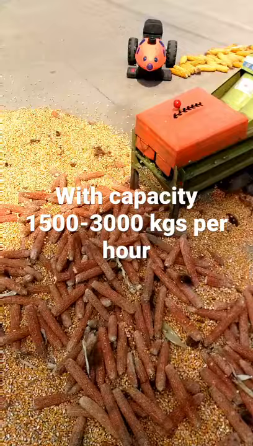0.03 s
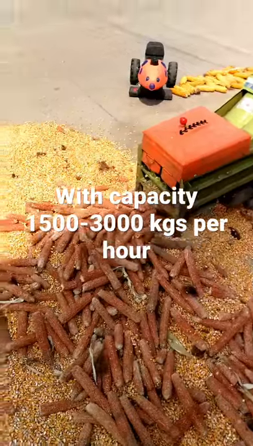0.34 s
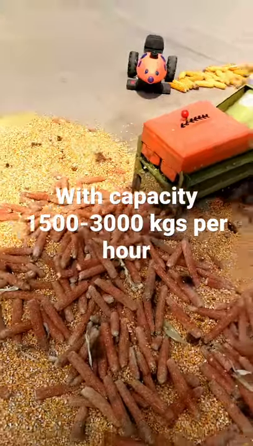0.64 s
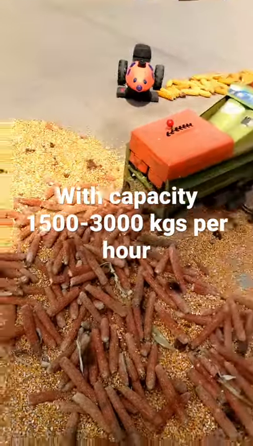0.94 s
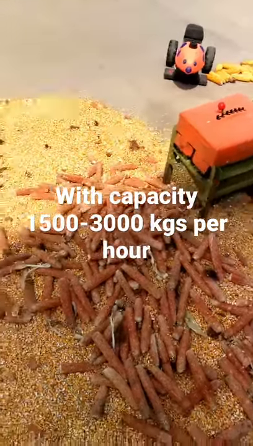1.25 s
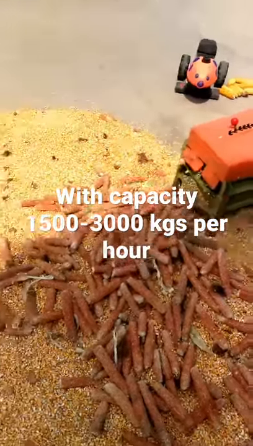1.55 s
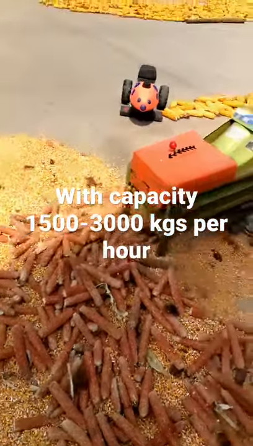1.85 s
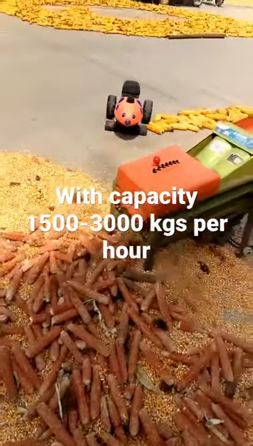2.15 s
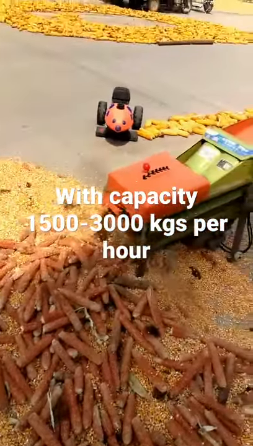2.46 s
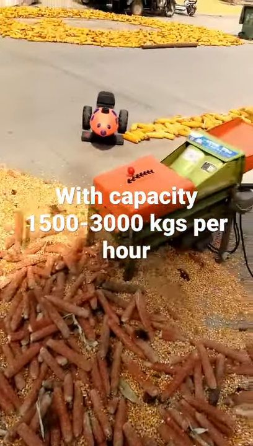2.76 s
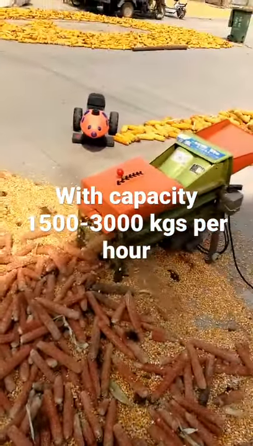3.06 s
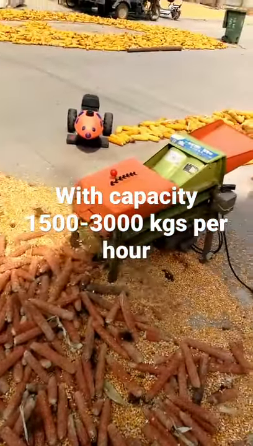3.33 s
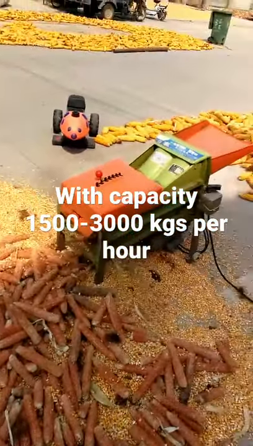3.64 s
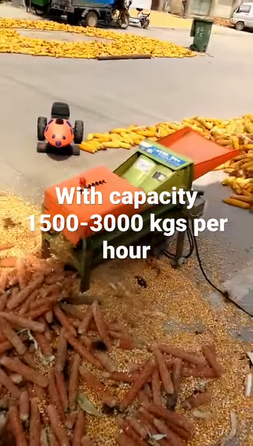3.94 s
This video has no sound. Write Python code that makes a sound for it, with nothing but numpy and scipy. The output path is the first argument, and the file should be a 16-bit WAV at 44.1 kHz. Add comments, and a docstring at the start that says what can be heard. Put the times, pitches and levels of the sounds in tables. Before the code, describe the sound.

Heard from close by outdoors, an electric corn thresher starts with a light rattle and grows louder as cobs go in. Irregular knocks, buzzing panels and a crunching spray of kernels continue over the wavering motor.

```python
"""An electric corn thresher runs outdoors, heard from close by. At first the drum rattles almost empty.
Then cobs are fed in: they tumble and knock against the sheet-steel casing and make it ring.
Kernels snap off with a crunch and hail on the metal, and loose panels buzz harder after each knock.
Underneath, the frame rumbles and the motor's whine sags a little under the load."""
import sys
import numpy as np
from scipy import signal
from scipy.fft import rfft, irfft
from scipy.io import wavfile

SR = 44100
rng = np.random.default_rng(int(sys.argv[2]) if len(sys.argv) > 2 else 0)


def transcribe(u):
    """Save the signal u as a 16-bit wav file named by the first command-line argument.

    u: samples, shape (n,) or (channels, n), limited to [-1, 1]; the rate is SR.
    q: integer samples, one column per channel.
    """
    v = np.clip(np.atleast_2d(u).T, -1, 1)
    q = np.round(v * 32767).astype(np.int16)
    wavfile.write(sys.argv[1], SR, q)


N = 176400
T = np.arange(N) / SR
START_S, CUTOFF_HZ = 0.107, 7600
DEEP_BELOW_HZ = 520  # lower tones drum and thud, higher ones clatter and clack

# The frame's rumble. Each row: pitch in Hz, relative level in dB.
RUMBLE_SPECTRUM = [(20, -14), (50, -4.5), (75, -4.5), (120, 1), (200, -2.5), (500, -33.5)]
# The motor's whine. Each row: time in seconds, pitch in Hz, level in dB, roughness from 0 to 1.
MOTOR_WHINE = [(.12, 488, -32, .45), (.27, 488, -37, 0.6), (.33, 487, -27.5, 0.7), (.58, 485, -31, 0.3),
               (.66, 482, -25.5, 0), (.9, 482, -21.5, 0.1), (1.2, 477, -28, 1), (1.45, 475, -25, 0.5),
               (2.3, 477, -27, 1), (2.8, 477, -30.5, 0.6), (3.45, 481, -24, 0.56), (4, 483, -28.5, 0.46)]
# The ringing of the loose panels. Each row: pitch in Hz, width in Hz, level in dB.
PANEL_TONES = [(371.5, 96, -32), (708, 35, -43), (959, 25, -36), (997, 9.5, -33.5), (1200, 64, -40),
               (1496, 44, -40), (1642, 82, -37), (2466, 100, -45.5), (3176, 150, -46)]
# How much the treble flickers. Each row: pitch in Hz, size of the swings in dB.
FLICKER_DEPTH = [(1200, 1.5), (2200, 3), (3100, 5.5), (4200, 4.5), (5400, 6.5), (7500, 4.5)]
# The flow of kernels. Each row: time in seconds, relative level in dB.
KERNEL_FLOW = [(.12, -43.5), (.45, -39.5), (.6, -30), (.71, -28), (.725, -26), (.76, -20.5), (1.0, -20.5),
               (1.21, -18.5), (1.9, -15.5), (2.45, -15), (3.06, -18), (3.49, -15.5), (3.97, -20)]
# Kernels hitting steel. Each row: pitch in Hz, relative level in dB.
KERNEL_SPECTRUM = [(1200, -36.5), (2500, -30.5), (3300, -6), (4200, -3.5), (5000, -2), (5700, 0.5),
                   (6500, -1), (7300, 2.5), (7800, 0.5)]
# The first rush of kernels is the brightest. Each row: time in seconds, top treble boost in dB.
KERNEL_BRIGHTNESS = [(.12, 5.5), (.7, 3), (1.3, 1), (2, -3), (4, -1)]
# The ringing of the sieve. Each row: pitch in Hz, width in Hz, relative level in dB.
SIEVE_TONES = [(2430, 150, -13), (3045, 20, -22), (3805, 46, -21.5), (6500, 150, -17)]
# The crunch of cobs being stripped. Each row: time in seconds, relative level in dB.
CRUNCH_LEVEL = [(.12, -32.5), (.45, -30), (.72, -27.5), (.75, -22.5), (1.05, -25), (1.3, -22.5),
                (2.1, -20.5), (2.8, -21), (3.48, -22), (3.97, -25)]
# Kernels snapping off. Each row: pitch in Hz, relative level in dB.
SNAP_SPECTRUM = [(25, -26), (70, -23.5), (130, -9.5), (250, 2), (600, -1), (1150, 1), (1400, -0.5),
                 (1750, 0.5), (2200, -2.5), (2900, -5), (4000, -10), (8000, -17)]
# Cobs drumming on the casing (deep tones). Each row: time in seconds, relative level in dB.
DRUMMING_LEVEL = [(.12, -36.5), (.58, -27.5), (.66, -23), (.85, -19.5), (1.05, -19), (1.35, -17.5),
                  (1.9, -16.5), (2.25, -20.5), (2.7, -19.5), (3.22, -24), (3.48, -21.5), (3.97, -28)]
# Cobs clattering on the bars (higher tones). Each row: time in seconds, relative level in dB.
CLATTER_LEVEL = [(.12, -27.5), (.55, -26), (.75, -19), (1.0, -20.5), (1.22, -16), (1.55, -18.5), (2.4, -16),
                 (3.05, -17), (3.15, -17), (3.5, -20.5), (3.97, -20)]
# The ringing of the casing. Each row: pitch in Hz, width in Hz, relative level in dB.
CASING_TONES = [(167.1, 13, -11.5), (233.6, 50, -7), (253.8, 24, -4), (278.6, 17, -6), (308.4, 17, -9),
                (359.6, 21, -6.5), (430, 32, -8.5), (490.2, 31, -11), (637, 110, -8), (714, 42, -4.5),
                (754.5, 21, -12), (841, 70, -7), (928, 54, -4), (1012, 23, -11.5)]
# Hard knocks of single cobs. Each row: start in seconds, relative thud and clack levels in dB.
HARD_KNOCKS = [(.108, -28, -21.5), (0.168, -25, -16), (0.207, -22, -21), (.313, -28, -16),
               (.381, -31, -19.5), (.417, -28, -18), (0.486, -15, -12.5), (0.612, -6, -16),
               (.662, -23, -10), (0.732, -6, -12), (0.882, -10, -13), (1.109, -6, -9), (1.146, -10, -18.5),
               (1.208, -4, -8), (1.33, 0, -16), (1.363, -7, -15.5), (1.434, -7, -12), (1.655, -2, -10),
               (1.804, -3, -10.5), (2.078, -3, -9), (2.257, -3, -17.5), (2.464, 1, -6), (2.537, -3, -12),
               (2.575, -17, -18.5), (2.745, -17, -8.5), (2.832, -17, -14), (3.027, 0, -7.5),
               (3.067, -6, -8), (3.334, -16, -7.5), (3.383, -0.5, -29), (3.418, -9, -9), (3.495, -9, -9.5),
               (3.62, -5, -25), (3.748, -12, -18), (3.901, -16, -17.5)]
# The tones in one knock. Each row: pitch in Hz, relative level in dB, seconds to fade by 60 dB.
KNOCK_TONES = [(257, -5, 0.056), (343, -10.5, 0.025), (560, -13.5, 0.037), (727, 1, 0.019), (906, -2, .045),
               (1005, -9.5, 0.063)]


def from_db(db):
    """Turn decibels into a number to multiply by."""
    return 10 ** (np.asarray(db) / 20)


def unit_power(x):
    """Scale a sound to an average power of 1."""
    return x / np.sqrt(np.mean(x ** 2) + 1e-20)


def over_time(rows):
    """Join a table's rows with straight lines: one curve for each column after the time."""
    times, *columns = np.transpose(rows)
    return [np.interp(T, times, column) for column in columns]


def drift(rate_hz):
    """A smooth random wander of about 1 either way; a higher rate moves faster."""
    step, warm_up = 40, 2000
    r = np.exp(-2 * np.pi * rate_hz * step / SR)
    noise = rng.standard_normal(N // step + warm_up + 2)
    slow = signal.lfilter([1], [1, -2 * r, r * r], noise)[warm_up:]
    return np.interp(np.arange(N) / step, np.arange(len(slow)), unit_power(slow))


def ring(x, hz, width_hz):
    """Make a sound ring at one pitch; a narrower width rings longer."""
    r = np.exp(-np.pi * width_hz / SR)
    feedback = [1, -2 * r * np.cos(2 * np.pi * hz / SR), r * r]
    return signal.lfilter(np.array([1, 0, -1]) * (1 - r * r) / 2, feedback, x + 1e-18)


def colour(x, spectrum):
    """Shape a sound's lows and highs, then scale it to a power of 1."""
    hz, db = np.transpose(spectrum)
    freqs = np.maximum(np.fft.rfftfreq(N, 1 / SR), 1)
    gain = from_db(np.interp(np.log(freqs), np.log(hz), db)) * (freqs < CUTOFF_HZ)
    return unit_power(irfft(rfft(x) * gain, N))


def impacts(per_s, spread_db):
    """Clicks at random times; more spread makes a few of them stand out."""
    sizes = from_db(spread_db * np.minimum(rng.exponential(1, N), 4))
    return sizes * (rng.random(N) < per_s / SR)


def bursts(clicks, fade_s):
    """Every click sets off a short, fading burst of noise."""
    power = signal.lfilter([1], [1, -np.exp(-1 / (fade_s * SR))], clicks ** 2 + 1e-18)
    return np.sqrt(power) * rng.standard_normal(N)


def flicker(x, band_hz=130):
    """The treble flickers: each narrow band swells and fades by itself."""
    freqs, spectrum = np.fft.rfftfreq(N, 1 / SR), rfft(x)
    hz, depth_db = np.transpose(FLICKER_DEPTH)
    out = x
    for centre in np.arange(1200, CUTOFF_HZ, band_hz):
        band = irfft(spectrum * np.maximum(0, 1 - abs(freqs - centre) / band_hz), N)
        swing = drift(rate_hz=12)
        swing = swing - 0.38 * swing ** 2  # dips go further than swells
        gain = from_db(np.interp(centre, hz, depth_db) * swing)
        out = out + band * (unit_power(gain) - 1)
    return out


def soft_thump(start_s=3.385, length_s=0.038, hz=55, db=-33):
    """One soft thump: a low tone swells and dies away."""
    age = np.clip(T - start_s, 0, length_s)
    return from_db(db) * np.sin(np.pi * age / length_s) * np.sin(2 * np.pi * hz * age)


def frame_rumble():
    """The frame shakes along with the drumming of the cobs."""
    level_db = over_time(DRUMMING_LEVEL)[0] - 20.5 - 0.9 * drift(rate_hz=3.2)
    return from_db(level_db) * colour(rng.standard_normal(N), RUMBLE_SPECTRUM)


def panel_rattle(jolt_db=13.5, jolt_fade_s=0.024):
    """Loose panels buzz as the drum turns, much harder just after each knock."""
    jolts = [(T > start) * np.exp(-abs(T - start) / jolt_fade_s) for start, _, _ in HARD_KNOCKS]
    shaking = from_db(jolt_db * np.max(jolts, axis=0))
    buzz = bursts(impacts(per_s=1100, spread_db=5.5) * shaking, fade_s=0.0024)
    return sum(from_db(db) * unit_power(ring(ring(buzz, hz, width_hz), hz, hz * 0.13))
               for hz, width_hz, db in PANEL_TONES)


def motor_whine(wobble_hz=1.43, breakup_hz=13.3):
    """The motor's whine wavers, and turns rough as cobs jolt the drum."""
    hz, db, roughness = over_time(MOTOR_WHINE)
    roughness = np.clip(roughness, 0, 1)
    phase = 2 * np.pi * np.cumsum(hz + wobble_hz * drift(rate_hz=12.6)) / SR
    smooth = np.sqrt(2 * (1 - roughness ** 2)) * np.sin(phase)
    broken = drift(breakup_hz) * np.sin(phase) + drift(breakup_hz) * np.cos(phase)
    return from_db(db) * (smooth + roughness * broken)


def kernel_hail(surge_db=0.25, bright_above_hz=4800):
    """Kernels hail on steel in slight surges and make the sieve ring."""
    hits = impacts(per_s=1600, spread_db=1.5) * from_db(surge_db * drift(rate_hz=22))
    hail = bursts(hits, fade_s=0.0076)
    sieve = sum(from_db(db) * unit_power(ring(hail, hz, width_hz)) for hz, width_hz, db in SIEVE_TONES)
    spray = colour(hail, KERNEL_SPECTRUM) + sieve
    treble = signal.sosfiltfilt(signal.butter(4, bright_above_hz, "high", fs=SR, output="sos"), spray)
    spray = spray + treble * (from_db(over_time(KERNEL_BRIGHTNESS)[0]) - 1)
    return from_db(over_time(KERNEL_FLOW)[0] - 0.94) * spray


def stripping_crunch():
    """Kernels snap off the cobs in a dense crunch; each hard knock adds a crack."""
    snaps = unit_power(bursts(impacts(per_s=550, spread_db=0), fade_s=0.0085))
    starts, _, clack_db = np.transpose(HARD_KNOCKS)
    clicks = np.zeros(N)
    clicks[(starts * SR).astype(int)] = from_db(clack_db)
    cracks = from_db(3) * bursts(clicks / clicks.max(), fade_s=0.006)
    return from_db(over_time(CRUNCH_LEVEL)[0] + 3) * colour(snaps + cracks, SNAP_SPECTRUM)


def tumbling_cobs(tone_spread_db=2):
    """Tumbling cobs ring the steel casing; every hit stirs each tone by a different amount."""
    cobs = impacts(per_s=520, spread_db=0.7)
    drumming = from_db(over_time(DRUMMING_LEVEL)[0] - 2)
    clatter = from_db(over_time(CLATTER_LEVEL)[0] - 4)
    out = np.zeros(N)
    for hz, width_hz, db in CASING_TONES:
        hits = cobs * from_db(tone_spread_db * rng.standard_normal(N)) * rng.choice([-1, 1], N)
        tone = unit_power(ring(ring(hits, hz, width_hz), hz, hz * 0.32))
        out += (clatter if hz > DEEP_BELOW_HZ else drumming) * from_db(db) * tone
    return out


def cob_knocks(contact_s=0.00392, low_cut_hz=178):
    """Single cobs hit hard: a thud and a clack, a little different each time."""
    out, t = np.zeros(N + SR), np.arange(SR // 5) / SR
    hz, db, fade_s = np.transpose(KNOCK_TONES)
    for start_s, thud_db, clack_db in HARD_KNOCKS:
        pitches = hz * (1 + 0.04 * rng.standard_normal(len(hz)))
        delays = contact_s * rng.random(len(hz))  # each tone starts at its own moment in the hit
        age = np.maximum(t[:, None] - delays, 0)
        peak_db = db + np.where(hz > DEEP_BELOW_HZ, clack_db, thud_db) - 0.5
        tones = from_db(peak_db - 60 * age / fade_s) * np.sin(2 * np.pi * pitches * age)
        start = int(start_s * SR)
        out[start:start + len(t)] += tones.sum(axis=1)
    return signal.sosfilt(signal.butter(3, low_cut_hz, "high", fs=SR, output="sos"), out[:N])


def scene():
    """The kernels, the machine and the cobs, added into one channel."""
    kernels = flicker(stripping_crunch() + kernel_hail())
    thresher = panel_rattle() + tumbling_cobs() + motor_whine() + cob_knocks()
    return (kernels + thresher + frame_rumble() + soft_thump())[None]


def record(dry, ceiling=0.92):
    """The sound starts suddenly; its tallest peaks are rounded and its highest treble is cut."""
    x = dry * (T >= START_S)
    rounded = x / (1 + (x / ceiling) ** 6) ** (1 / 6)
    treble_cut = signal.firwin(801, CUTOFF_HZ + 40, window=("kaiser", 9), fs=SR)
    return signal.fftconvolve(rounded, treble_cut[None], mode="same")


dry = scene()
out = record(dry)
transcribe(out)
```